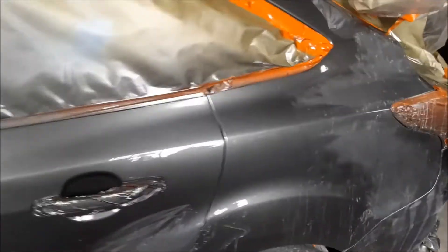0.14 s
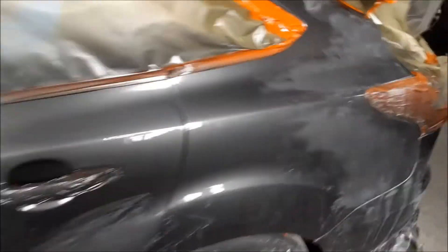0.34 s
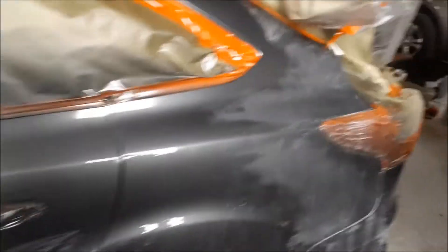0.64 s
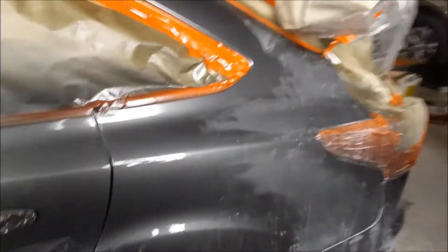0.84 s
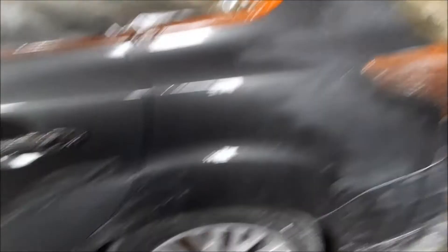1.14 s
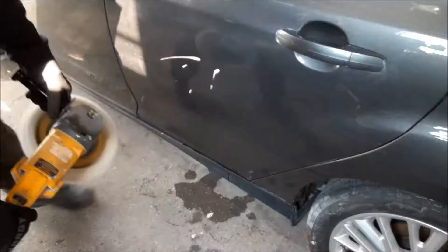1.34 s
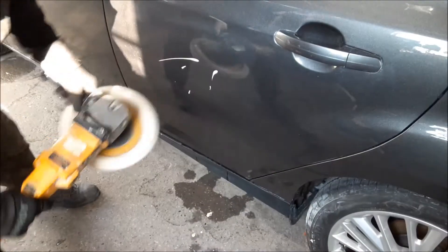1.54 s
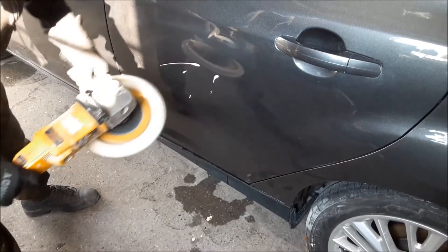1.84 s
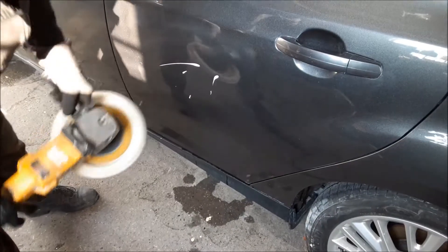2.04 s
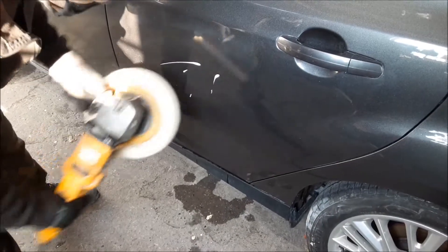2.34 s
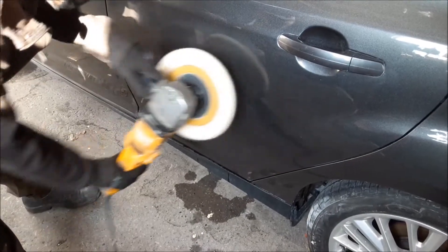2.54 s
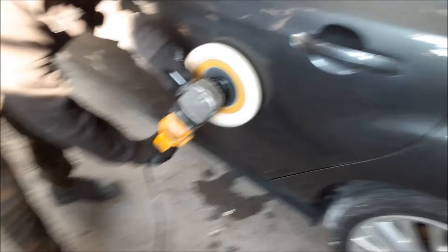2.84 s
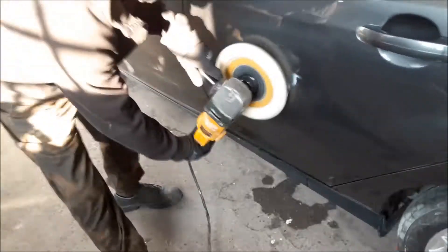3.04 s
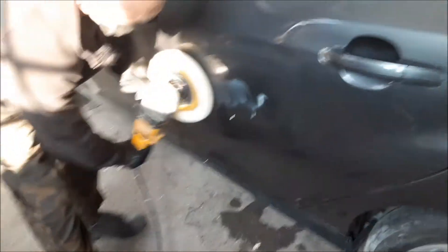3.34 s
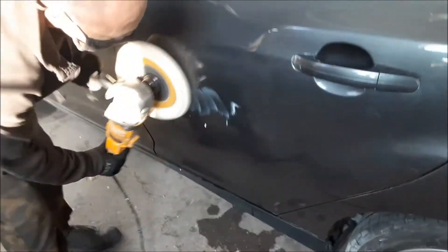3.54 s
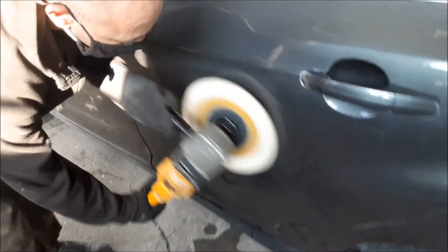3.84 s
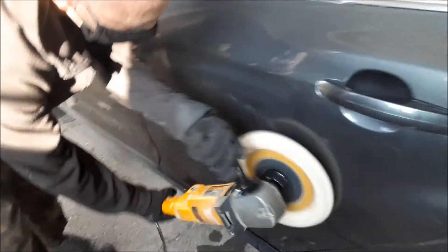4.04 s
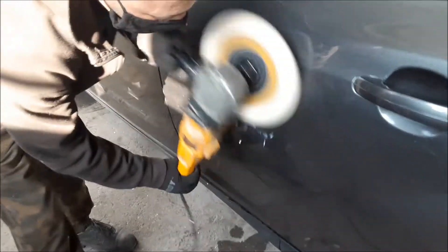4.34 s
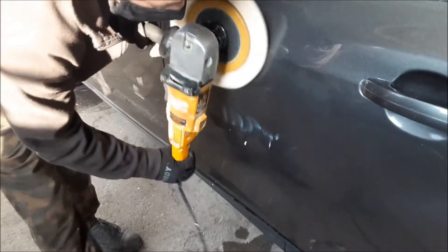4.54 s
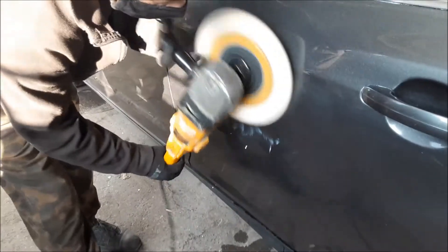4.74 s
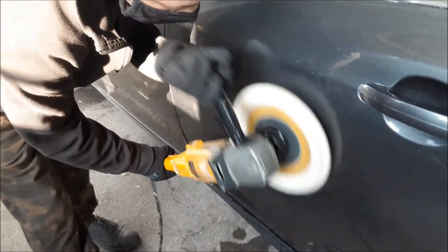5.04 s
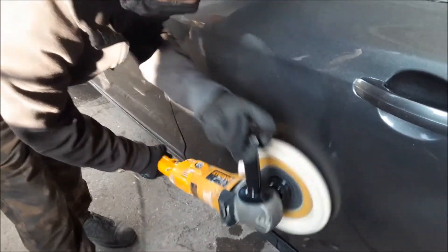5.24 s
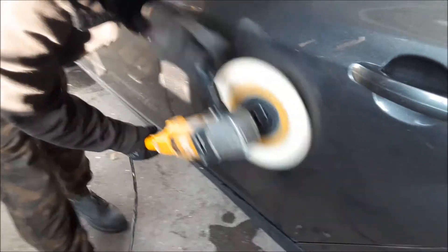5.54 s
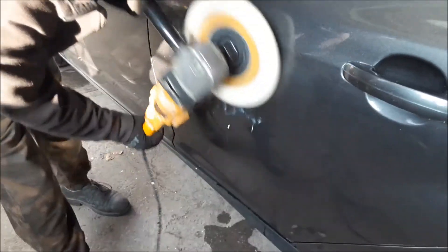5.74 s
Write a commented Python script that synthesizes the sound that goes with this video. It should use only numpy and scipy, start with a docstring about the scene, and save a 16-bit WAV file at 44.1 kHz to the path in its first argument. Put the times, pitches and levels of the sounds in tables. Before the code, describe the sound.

Machines drone and shoes scuff on concrete, then a power polisher whirs steadily close by, its pad hissing over car paint.

```python
"""Machines drone behind the wall of a body shop while shoes scuff over the concrete floor.
After an instant of silence a rotary buffer is at work on a car door, close by. Its motor whines
and sags under load, the cooling fan rushes and the angle gear rasps. The pad hisses, scrapes and
grabs on the paint and sets the door rumbling; now and then its edge or the gear head knocks."""
import sys
import numpy as np
from scipy import signal
from scipy.fft import rfft, irfft, next_fast_len
from scipy.io import wavfile
from scipy.ndimage import uniform_filter1d, map_coordinates

SR = 44100
rng = np.random.default_rng(int(sys.argv[2]) if len(sys.argv) > 2 else 0)


def write(x):
    x = np.atleast_2d(x).T
    wavfile.write(sys.argv[1], SR, np.round(np.clip(x, -1, 1) * 32767).astype(np.int16))


N = 260190

DRONE_END_S, BUFFER_START_S = 1.363, 1.396
MAINS_BUZZ_HZ = 120
# stereo image of the close tool and of the shop: f/Hz, left-right correlation
TOOL_IMAGE = [(100, 0.9), (350, 0.81), (700, 0.73), (1400, 0.22), (2800, 0.011), (5000, -0.022),
              (14000, -0.0012)]
SHOP_IMAGE = [(100, 1), (300, 0.89), (800, 0.21), (2000, 0.051), (8000, .05)]


def buffer():
    """The armature drives fan and gear; the pad rubs unevenly, drags the speed down and shakes the door."""
    # armature speed, sagging when the pad is pressed down: t/s, speed/Hz
    armature_speed = [(1.42, 175.3), (1.66, 174.8), (2.38, 175.3), (2.52, 174.4), (2.56, 175.3),
                      (2.78, 174.8), (2.82, 173.4), (2.94, 175.0), (2.98, 174.5), (3.04, 171.0),
                      (3.1, 172.9), (3.18, 170.5), (3.22, 172.0), (3.46, 171.4), (3.64, 173.1),
                      (3.7, 171.7), (3.86, 171.8), (3.9, 171.0), (3.98, 172.9), (4.18, 173.5),
                      (4.24, 173.9), (4.5, 172.5), (4.54, 170.8), (4.74, 172.0), (5.02, 172.3),
                      (5.12, 173.6), (5.16, 172.6), (5.4, 173.7), (5.6, 173.1), (5.72, 174.3),
                      (5.74, 172.9), (5.88, 173.2)]
    # treble ride of pad and gear head: t/s, level/dB
    treble_ride = [(1.42, -24.5), (1.56, -24.5), (1.68, -27), (1.86, -25.5), (2.0, -28.5), (2.14, -25),
                   (2.72, -24.5), (2.78, -23), (2.94, -27), (3.0, -24), (3.36, -28.5), (3.7, -27),
                   (3.84, -28.5), (3.92, -23), (4.0, -26), (4.14, -23.5), (4.22, -25.5), (4.28, -24),
                   (5.06, -25), (5.2, -21.5), (5.38, -22.5), (5.46, -21), (5.52, -24), (5.88, -25.0)]
    # the tool drifts from left to right: t/s, left minus right/dB (scaled for each part)
    tool_drift = [(1.4, 1.5), (1.9, 1), (3.3, 0.2), (4.3, -0.5), (5.9, -1.5)]
    # each register of the noise leans to one side: f/Hz, left minus right/dB
    lean = [(500, 0.5), (1000, -1), (1600, -2.5), (2100, -0.5), (2700, 3.5), (3600, -2), (4400, -1.5),
            (5200, 2.5), (7000, 0)]
    speed, = curves(armature_speed)
    sag = 175.1 - speed  # Hz below free running
    judder = (0.25 + 0.1 * np.maximum(sag, 0)) * wobble(60)
    turns = np.cumsum(speed + judder) / SR
    treble_db = curves(treble_ride)[0] - np.mean(treble_ride, axis=0)[1]
    side_db, = curves(tool_drift)
    lurch_db = 0.71 * wobble(36)  # the pad's uneven drag
    rasp = tooth_force(turns)
    wash = door_panel(sag) + cooling_fan(sag, lurch_db, side_db, rasp(0.063))
    wash += angle_gear(lurch_db, rasp(0.38))
    wash += pad_hiss(treble_db, lurch_db, side_db, rasp(0.077))
    rattle = head_rattle(treble_db, lurch_db, side_db)
    wash = reflections(wash + pad_scrape(), scatter=0.4)
    wash = filtered(wash, lambda hz: pan(along(lean, hz)))
    motor = motor_whines(turns, sag) + armature_buzz(turns, sag) + flares(turns)
    return motor + wash + rattle + rough_swells(rasp(0.23)) + knocks()


def motor_whines(turns, sag):
    """Whines locked to the armature: four strong ones shift as the tool turns, two follow the load."""
    # pitches of the strong whines: multiple of armature speed
    orders = [12, 12.685, 19, 25]
    # their level rides: t/s, left/dB, right/dB
    low = [(1.42, -27, -36), (1.56, -34, -31), (1.86, -33, -46), (2.26, -25, -31), (2.52, -38, -37),
           (2.74, -34, -28), (2.82, -27, -30), (2.96, -30, -34), (3.02, -24, -28), (3.12, -33, -31),
           (3.38, -35, -43), (3.56, -35, -34), (3.74, -29, -42), (3.8, -36, -33), (3.96, -31, -36),
           (4.06, -34, -28), (4.46, -30, -41), (4.98, -26, -25), (5.12, -33, -39), (5.26, -32, -31),
           (5.48, -38, -33), (5.56, -31, -41), (5.64, -32, -26), (5.88, -31, -42)]
    bearing = [(1.42, -34, -40), (1.68, -28, -37), (1.82, -38, -40), (1.96, -27, -46), (2.16, -40, -36),
               (2.38, -33, -41), (2.5, -37, -36), (2.96, -38, -37), (3.0, -28, -38), (3.06, -23, -33),
               (3.28, -39, -38), (3.44, -30, -34), (3.52, -36, -44), (3.62, -38, -31), (3.7, -31, -36),
               (3.86, -33, -24), (4.04, -24, -36), (4.28, -45, -43), (4.34, -37, -35), (5.12, -27, -39),
               (5.26, -32, -26), (5.62, -29, -34), (5.7, -39, -41), (5.88, -38, -39)]
    middle = [(1.42, -30, -38), (1.62, -42, -31), (1.66, -30, -34), (1.98, -31, -42), (2.04, -41, -44),
              (2.16, -28, -28), (2.36, -33, -39), (2.44, -25, -28), (2.56, -37, -36), (2.86, -26, -33),
              (3.1, -36, -28), (3.2, -24, -35), (3.32, -30, -27), (3.44, -34, -41), (3.62, -30, -25),
              (3.78, -37, -34), (3.84, -27, -29), (4.1, -34, -29), (4.18, -26, -25), (4.34, -30, -42),
              (4.42, -26, -31), (4.66, -38, -28), (4.76, -42, -38), (5.02, -23, -29), (5.06, -30, -38),
              (5.16, -27, -22), (5.32, -40, -37), (5.54, -27, -28), (5.68, -30, -36), (5.88, -29, -23)]
    high = [(1.42, -34, -29), (1.66, -35, -25), (1.72, -32, -35), (2.12, -42, -27), (2.2, -42, -39),
            (2.36, -42, -24), (2.66, -41, -32), (2.76, -41, -23), (2.9, -42, -38), (3.02, -30, -33),
            (3.22, -32, -30), (3.3, -24, -23), (3.44, -29, -30), (3.5, -23, -31), (3.58, -32, -27),
            (3.66, -24, -32), (3.8, -31, -22), (3.94, -34, -32), (4.12, -34, -24), (4.36, -33, -34),
            (4.42, -29, -28), (4.54, -26, -30), (4.64, -36, -37), (4.92, -34, -38), (4.96, -34, -28),
            (5.18, -30, -26), (5.34, -39, -36), (5.42, -31, -24), (5.52, -34, -25), (5.88, -29, -34)]
    # width of the whines, and of the high one alone: t/s, angle/rad (0 centred, 1.57 all side)
    width = [(1.42, 1.2), (2.0, 1.1), (2.15, .3), (2.95, .15), (3.35, .8), (3.85, .8), (4.05, .35),
             (4.5, .35), (4.7, .9), (4.95, .4), (5.5, .5), (5.8, 1)]
    high_width = [(1.42, .95), (2.6, 1.05), (2.8, .7), (3.12, 1.1), (3.25, .2), (3.5, .55), (3.7, .4),
                  (3.88, 1.1), (4.0, .2), (4.3, .2), (4.5, 1.2), (5.0, .3), (5.4, .2), (5.6, 1), (5.85, .4)]
    # lesser whines: multiple of armature speed, free-running level/dB, gain with sag/(dB/Hz)
    lesser_whines = [(18, -45, 1.6), (46, -42, -.6)]

    def whine(order, spread):
        shiver = flutter()
        drift = curves(spread)[0] + 0.25 * wobble(4)
        return shiver * tone(order * turns, scatter=0.3, rate=42, drift=drift)

    out = np.zeros((2, N))
    for order, ride, spread in zip(orders, [low, bearing, middle, high], [width] * 3 + [high_width]):
        out += amp(0.5 + np.array(curves(ride))) * whine(order, spread)
    for order, free_db, db_per_hz in lesser_whines:
        beaming_db = 1.5 + 5.5 * wobble(7)
        out += amp(free_db + db_per_hz * sag + beaming_db) * whine(order, width)
    return out


def armature_buzz(turns, sag):
    """The armature buzzes and its imbalance shakes the door; pressing damps the housing's octave."""
    # buzz partials: multiple of armature speed, level/dB
    partials = [(5, -45), (6, -41.5), (7, -43), (8, -44), (9, -44), (10, -43), (11, -42), (17, -42),
                (20, -47), (21, -45), (22, -42.5), (23, -41), (24, -41), (26, -42), (31, -46), (49, -46)]
    buzz = sum(amp(db) * tone(order * turns, scatter=0.81, rate=12) for order, db in partials)
    shake_db = -57.5 + 2.74 * sag + 1.3 * wobble(11)
    shake = amp(shake_db) * pan(1.3) * tone(turns, scatter=0.1, rate=18)
    octave = amp(-49 - 4 * sag) * flutter() * tone(2 * turns, scatter=0.23, rate=24)
    return amp(-0.59 + sag) * buzz + shake + octave


def flares(turns):
    """Single partials flare up as the tool is turned."""
    # flares: t/s, length/s, multiple of armature speed, level/dB
    cues = [(1.405, .03, 17.1, -28), (1.52, .12, 22, -34), (1.66, .16, 6, -34), (2.22, .1, 24, -35),
            (2.52, .2, 46, -30.5), (3.38, .16, 23, -33), (3.82, .2, 7, -31.5), (3.84, .08, 18, -31),
            (4.0, .06, 18, -31), (4.04, .1, 6, -33), (4.28, .09, 6, -34.5), (1.7, .2, 24, -35),
            (4.8, .2, 8, -34), (4.93, .12, 18, -31)]
    out, shiver = np.zeros((2, N)), flutter()
    for s, length, order, db in cues:
        near = around(s, length)
        partial = np.sqrt(2) * np.sin(2 * np.pi * (order * turns[near] + rng.random((2, 1))))
        out[:, near] += amp(db) * swell(s, length, near) * shiver[near] * partial
    return out


def flutter():
    """Backlash makes a whine's gain flutter."""
    return unit(amp(2.6 * wobble(90)))


def tooth_force(turns):
    """Teeth bite harder once a turn and torque pulses with the mains; gives force by share of chatter."""
    bite = 1 + 0.028 * np.sin(2 * np.pi * turns) + 0.022 * np.sin(2 * np.pi * MAINS_BUZZ_HZ * clock())
    chatter = impacts(rate=750, spread_db=7.5, life=0.00095)
    return lambda share: bite * np.sqrt(1 - share + share * chatter)


def cooling_fan(sag, lurch_db, side_db, drive):
    """The fan's midrange rush of air."""
    # air colour: f/Hz, level/dB
    colour = [(200, -21.5), (400, -10.5), (520, -10), (650, -0.5), (780, -5), (920, -8.5), (1080, -2),
              (1300, 1), (1600, 0.5), (2100, -1.5), (2600, -2.5), (3500, -7.5), (6000, -46)]
    level_db = -26 + 0.076 * sag + 0.52 * lurch_db
    return amp(level_db) * pan(1.5 + 2 * side_db) * rush(colour, TOOL_IMAGE, drive)


def angle_gear(lurch_db, drive):
    """Chattering teeth make a bright rasp that lurches with the pad's drag."""
    # rasp colour: f/Hz, level/dB
    colour = [(900, -6.5), (1800, -8), (2600, -4), (3200, 1), (3700, -0.5), (4050, 0), (4450, -12),
              (5000, -5), (5700, -17), (7000, -15.5), (12000, -21)]
    # rasp ride: t/s, level/dB
    ride = [(1.42, -27.5), (1.92, -27.5), (2.24, -28), (2.3, -27.5), (3.22, -25), (3.36, -27), (3.52, -31),
            (3.68, -25), (3.72, -25), (4.18, -24), (4.24, -24), (4.46, -23), (4.92, -26.5), (5.2, -25),
            (5.64, -26.5), (5.88, -27.5)]
    level_db = 0.4 + curves(ride)[0] + 1.36 * lurch_db
    return amp(level_db) * pan(-0.52) * rush(colour, TOOL_IMAGE, drive)


def pad_hiss(treble_db, lurch_db, side_db, drive):
    """The pad rubs a high hiss out of the paint."""
    # hiss colour: f/Hz, level/dB
    colour = [(3000, -4.5), (5500, 0), (6300, -1.5), (7100, -1.5), (7900, 1.5), (8500, 1.5), (9600, -4),
              (10300, -0.5), (11200, 3.5), (12200, -1), (13500, -2), (16000, -9)]
    level_db = -23 + 0.5 * treble_db + 0.87 * lurch_db
    return amp(level_db) * pan(1.3 * side_db - 0.3) * rush(colour, TOOL_IMAGE, drive)


def pad_scrape():
    """Tiny slips of the pad merge into a shrill scrape."""
    # scrape colour: f/Hz, level/dB
    colour = [(3500, -25), (4000, -7.5), (4250, -3), (4520, -0.5), (4750, -3.5), (5050, -4), (5450, -11),
              (6200, -28)]
    # scrape ride: t/s, level/dB
    ride = [(1.42, -27.5), (1.56, -28.5), (1.72, -31.5), (2.12, -30), (2.2, -34), (2.34, -26.5),
            (2.52, -36), (2.66, -27.6), (2.7, -37), (2.76, -27.5), (2.88, -31.5), (3.34, -30), (3.46, -29),
            (3.76, -26), (3.98, -30), (4.06, -24), (4.38, -27.5), (4.44, -27), (4.8, -27.5), (4.96, -30),
            (5.1, -27), (5.62, -28), (5.88, -26.5)]
    # the side it beams to: t/s, left minus right/dB (widened below)
    side = [(1.42, -9), (2.26, -7), (2.3, -8.5), (3.25, -5), (3.38, 1.5), (4.16, -6), (4.61, 4.5),
            (4.76, -3), (5.52, -2), (5.88, 0.5)]
    slips = np.sqrt(impacts(rate=450, spread_db=4, life=0.0049))
    return amp(0.5 + curves(ride)[0]) * pan(1.14 * curves(side)[0]) * rush(colour, TOOL_IMAGE, slips)


def head_rattle(treble_db, lurch_db, side_db):
    """Dense little knocks ring the gear head; the rattle swings wider than the hiss."""
    # ring of the gear head: f/Hz, level/dB
    colour = [(2000, -35), (3800, -20), (4550, -2), (5400, -18), (7500, -18), (8400, -7), (9600, -20),
              (10300, -10), (10750, -1), (11250, -1), (11800, -7), (13000, -14), (16000, -22)]
    hits = np.sqrt(impacts(rate=430, spread_db=6.5, life=0.0032))
    return amp(-32 + 2.7 * treble_db + lurch_db) * pan(4 * side_db) * rush(colour, TOOL_IMAGE, hits)


def rough_swells(drive, q=8.3):
    """Rough narrow-band swells, some gliding: pad grabs, bursts of high rattle and a flaring whine."""
    # swells: t/s, length/s, f/Hz, glide/(octaves/s), level/dB, left minus right/dB
    cues = [(1.62, .25, 4150, 0, -29, 0), (1.65, .13, 2900, 0, -32, 8), (1.99, .07, 2950, 0, -32, 8),
            (2.35, .05, 4450, 0, -26, -6), (3.018, .055, 1680, 0, -25.5, 5), (3.115, .2, 2020, 0, -27.5, 6),
            (3.202, .11, 3380, 0, -29, 6), (3.58, .07, 3600, 0, -28.5, -8), (3.85, .2, 1200, 0, -31.5, -4),
            (3.84, .16, 1950, 0, -31.5, -12), (4.29, .07, 1040, 0, -33, 0), (4.28, .05, 3120, -1.5, -29, 4),
            (4.41, .07, 3300, -1.6, -23.5, -2), (4.48, .05, 3000, -1.6, -27, 2),
            (4.545, .04, 2740, -1.6, -25.5, 5), (4.57, .11, 450, 0, -39.5, 2),
            (4.6, .2, 3550, 0, -29.5, -5), (4.75, .24, 1345, .1, -29.5, 1), (5.25, .15, 4650, 0, -28, -6),
            (5.26, .14, 10950, 0, -27, -3), (5.46, .035, 10950, 0, -24.5, -3)]
    out = np.zeros((2, N))
    force = drive * (rng.standard_normal((2, N)) + 1j * rng.standard_normal((2, N)))
    for s, length, hz, glide, db, side_db in cues:
        near = around(s, length)
        cycles = np.cumsum(hz * 2 ** (glide * (clock()[near] - s))) / SR
        roughness = signal.lfilter(*signal.butter(2, hz / q / 2, fs=SR), force[:, near])
        ring = unit(np.real(roughness * np.exp(2j * np.pi * cycles)))
        out[:, near] += amp(db) * pan(side_db) * ring * swell(s, length, near)
    return out


def knocks(t60_s=0.008):
    """Pad edge and gear head knock: each hit rings one well-damped resonance, with a little crack."""
    # knocks: t/s, f/Hz, level/dB, left minus right/dB
    cues = [(2.368, 4400, -10, -6), (3.013, 2070, -9, 9), (3.915, 1380, -9, -1), (4.406, 3270, -10, -8),
            (4.546, 2670, -8, 9), (5.036, 1980, -11, 6), (5.179, 4560, -7, -9), (5.1955, 10940, -9, -8),
            (5.312, 11000, -12, -4), (5.4615, 11020, -9, -7)]
    out = np.zeros((2, N))
    t = np.arange(int(2 * t60_s * SR)) / SR
    for s, hz, db, side_db in cues:
        crack = 0.22 * rng.standard_normal((2, len(t)))
        ring = amp(db - 60 * t / t60_s) * (np.sin(2 * np.pi * hz * t) + crack)
        ring = signal.lfilter(*signal.butter(2, hz / 2, "high", fs=SR), ring)
        start = round(s * SR)
        out[:, start:start + len(t)] += pan(side_db) * ring
    return out


def door_panel(sag, flat_sag_hz=1.8):
    """The door rumbles louder under pressure, until the pad lies flat and passes on no more."""
    # body of the door: f/Hz, level/dB
    colour = [(40, -34), (70, -22), (102, -6.5), (141, -3), (170, -0.5), (250, -1), (345, -5), (440, -7),
              (520, 0), (700, -57)]
    grip = flat_sag_hz * np.tanh(sag / flat_sag_hz)
    return amp(-53 + 5.85 * grip + 1.7 * wobble(16)) * pan(2.4) * rush(colour, TOOL_IMAGE)


def reflections(x, scatter):
    """Reflections off the moving tool and body add to the direct sound: drifting notches and bumps."""
    spectrum = signal.stft(x, nperseg=1024)[2]
    field = rng.standard_normal((2,) + spectrum.shape)
    for axis, size in [(2, 3), (2, 2), (3, 8), (3, 8)]:  # smooth over frequency, then time
        field = uniform_filter1d(field, size, axis)
    real, imag = scatter * unit(field + 0.097 * field[:, ::-1])
    gain = unit(np.hypot(1 + real, imag))
    return signal.istft(spectrum * gain, nperseg=1024)[1][:, :N]


def shoes_and_hiss():
    """A heel lands and scuffs drag grit over the floor; a soft hiss swells slowly before the silence."""
    # six scuffs, then the soft hiss: t/s, level/dB, rise/s, time to fade 20 dB/s
    cues = [(.172, -36.5, 0.013, 0.083), (.21, -40.5, 0.053, 0.12), (.33, -40.5, 0.016, .08),
            (.425, -42, .006, .04), (.868, -33.5, .014, 0.17), (.905, -35.5, 0.016, 0.11),
            (1.22, -41.5, 0.13, 0.22)]
    # colours of the gritty noise and of a heel on concrete: f/Hz, level/dB
    grit_colour = [(410, -34), (700, -4), (777, -9), (971, 0), (1330, -6), (2270, -2), (8420, -7.5),
                   (9730, -8.5), (14800, -3), (16000, -6)]
    heel_colour = [(300, -14), (600, -4), (1150, -9), (1410, 5), (1650, -5), (2270, -6), (3400, -16),
                   (7000, -32)]
    t = clock()

    def envelope(s, db, rise, fade):
        return amp(db - 20 * np.maximum(t - s - rise, 0) / fade) * np.clip((t - s) / rise, 0, 1)

    power = sum(envelope(*cue) ** 2 for cue in cues)
    grain = np.sqrt(power * (0.6 + 0.26 * impacts(rate=750, spread_db=4.5, life=0.00095)))
    heel = envelope(s=0.167, db=-35.5, rise=0.012, fade=0.045)
    return grain * rush(grit_colour, SHOP_IMAGE) + heel * rush(heel_colour, SHOP_IMAGE)


def shop_drone():
    """Machine tones hum and beat over a dull rumble and the air of the hall."""
    # tones of a motor and its belt-driven pump: f/Hz, level/dB
    hum_tones = [(51, -65), (70.5, -57), (120, -36.5), (142, -34.5), (223, -55), (275, -60), (291, -52),
                 (326, -68), (360.5, -46), (395, -59), (430, -47)]
    # colours of the rumble and the air: f/Hz, level/dB
    rumble_colour = [(25, -29), (60, -13), (95, -11), (135, -1), (190, -7), (250, -5.5), (400, -10.5),
                     (560, -17), (820, -16.5), (1250, -29.5), (2200, -27), (3500, -62)]
    air_colour = [(590, -11.5), (1000, -6.5), (1110, -7), (3050, -15), (3420, -14.5), (3800, -17),
                  (4620, -16), (7100, -27), (12100, -22.5), (16000, -27)]
    t = clock()
    hum = np.zeros((2, N))
    for hz, db in hum_tones:
        waver_db = 2.2 * (hz / 400) ** 2 * wobble(4.18)  # higher tones waver more
        hum += amp(db + waver_db) * tone(t * hz, scatter=0.089, rate=5.8)
    # two machines beat in the octave of the mains hum, which grows louder
    beat_period_s, beat_peak_s = 0.494, 0.2
    beat = np.abs(1 + 0.54 * np.exp(2j * np.pi * (t - beat_peak_s) / beat_period_s))
    octave_db = -37 + 6.5 * (np.minimum(t, DRONE_END_S) - DRONE_END_S / 2)
    octave = amp(octave_db) * beat * tone(t * 2 * MAINS_BUZZ_HZ, scatter=0.068, rate=6.7)
    rumble = amp(-35) * rush(rumble_colour, SHOP_IMAGE)
    air = amp(-45.5) * rush(air_colour, SHOP_IMAGE)
    return (hum + octave + rumble) * pan(1.7) + air


def far_hiss():
    """A faint whistling hiss swells from across the shop."""
    # hiss with two whistling peaks: f/Hz, level/dB
    colour = [(2500, -34), (3050, -18), (3260, -15), (3350, 0), (3450, -15), (3700, -22), (4200, -14),
              (4480, -14), (4600, -1), (4720, -13), (5100, -13), (6500, -22)]
    return amp(-48.5) * swell(s=1.25, length=0.2) * rush(colour, SHOP_IMAGE)


def rush(spectrum, image, drive=1):
    """Stereo noise of rms 1: random forcing of strength drive, coloured by a body."""
    def response(hz):
        width = np.arccos(np.clip(along(image, hz), -1, 1)) / 2
        low_cut = np.minimum(hz / spectrum[0][0], 1) ** 2
        return low_cut * amp(along(spectrum, hz)) * np.array([np.cos(width), np.sin(width)])
    mid, side = filtered(drive * rng.standard_normal((2, N)), response)
    return unit(np.array([mid + side, mid - side]))


def tone(cycles, scatter, rate, drift=0):
    """A stereo tone of rms 1 with shifting reflections; drift (rad) leads on the left, lags on the right."""
    angle = np.float32(2 * np.pi * (cycles - np.floor(cycles)))
    lead = rng.normal(0, scatter)
    ears = []
    for side in (1, -1):
        phase = angle + side * np.float32(drift)
        in_phase = 1 + scatter * wobble(rate)
        quadrature = side * lead + scatter * wobble(rate)
        ears.append(in_phase * np.cos(phase) + quadrature * np.sin(phase))
    return unit(np.array(ears))


def impacts(rate, spread_db, life):
    """Power (mean 1) of tiny random impacts of uneven size, each decaying over life seconds."""
    hits = (rng.random(N) < rate / SR) * amp(spread_db * np.clip(rng.standard_normal(N), -2, 2)) ** 2
    power = signal.lfilter([1], [1, -np.exp(-1 / (life * SR))], hits)
    return power / power.mean()


def wobble(rate, hop=128):
    """A smooth random curve, rate knots a second."""
    times = np.arange(N // hop + 2) * hop / SR
    coarse = np.float32(map_coordinates(rng.standard_normal(2048), [times * rate], mode="wrap"))
    ramp = np.arange(hop, dtype=np.float32) / hop
    return (coarse[:-1, None] + np.diff(coarse)[:, None] * ramp).ravel()[:N]


def swell(s, length, near=slice(None)):
    """A bell-shaped rise and fall around time s."""
    return np.exp(-2 * np.minimum(np.abs(clock()[near] - s) / length, 10) ** 2)


def around(s, length):
    """The samples that a swell at time s covers."""
    return slice(int((s - 2 * length) * SR), int((s + 2 * length) * SR))


def filtered(x, response):
    """x shaped by a frequency response."""
    size = next_fast_len(N + SR // 4)
    return irfft(rfft(x, size) * response(np.fft.rfftfreq(size, 1 / SR)), size)[..., :N]


def along(points, hz):
    """(Hz, value) points joined on a log axis."""
    freqs, values = np.transpose(points)
    return np.interp(np.log(hz + 1), np.log(freqs + 1), values)


def curves(rows):
    """One value per sample for each column after the time."""
    times, *columns = np.transpose(rows)
    return [np.interp(clock(), times, column) for column in columns]


def pan(db):
    """Left and right gains for a level difference."""
    return amp(np.array([[0.5], [-0.5]]) * db)


def amp(db):
    """Decibels to gain."""
    return 10 ** (np.asarray(db) / 20)


def unit(x):
    """Scaled to rms 1."""
    return x / np.sqrt(np.mean(x ** 2) + 1e-20)


def clock():
    """The time of each sample."""
    return np.arange(N) / SR


def scene():
    """First the shop, an instant of silence, then the buffer at full speed."""
    shop_gate = np.clip((DRONE_END_S - clock()) / 0.0046, 0, 1)
    buffer_gate = np.clip((clock() - BUFFER_START_S) / 0.00086, 0, 1)
    return shop_gate * (shop_drone() + shoes_and_hiss() + far_hiss()) + buffer_gate * buffer()


def record(dry):
    """A brick-wall high cut takes off the very top."""
    return filtered(dry, lambda hz: hz < 16050)


dry = scene()
out = record(dry)
write(out)
```